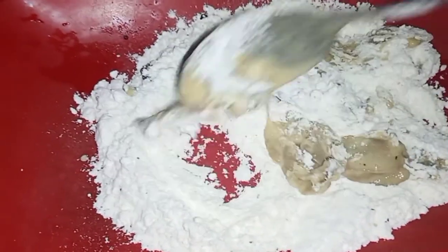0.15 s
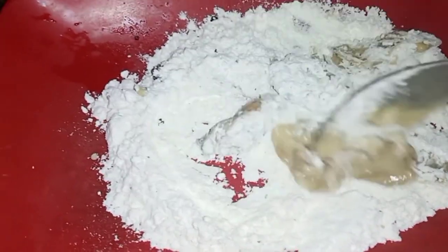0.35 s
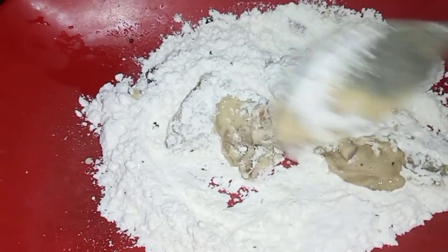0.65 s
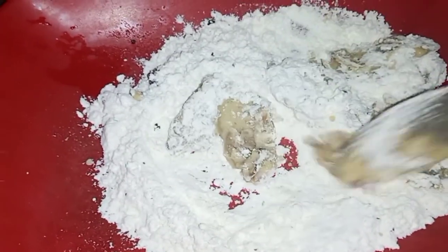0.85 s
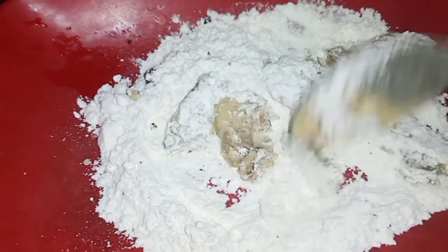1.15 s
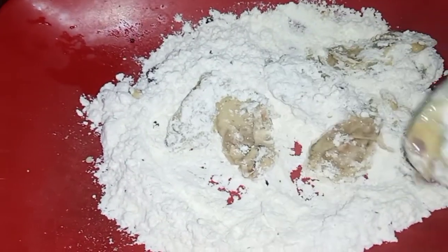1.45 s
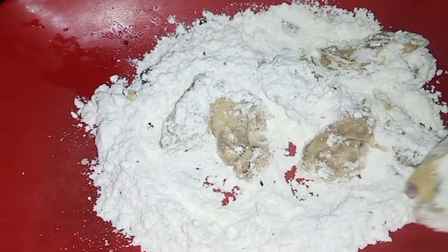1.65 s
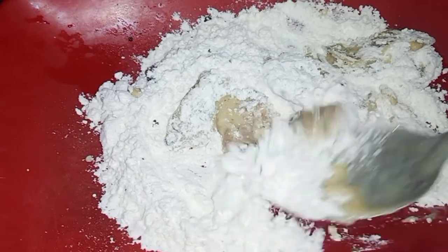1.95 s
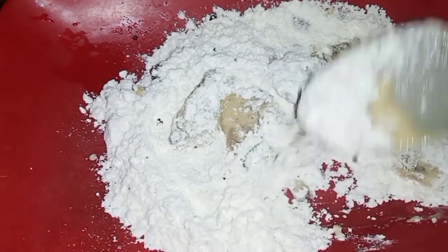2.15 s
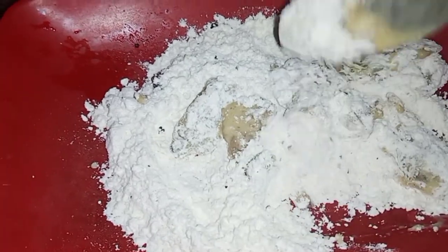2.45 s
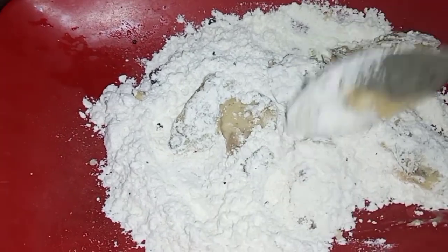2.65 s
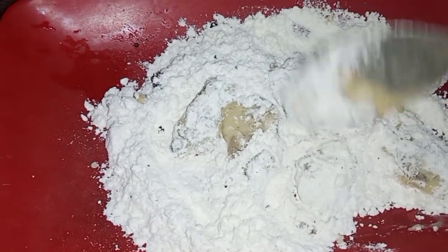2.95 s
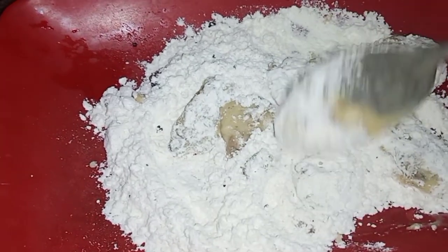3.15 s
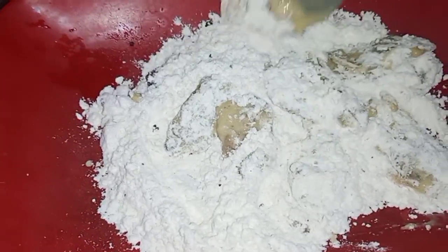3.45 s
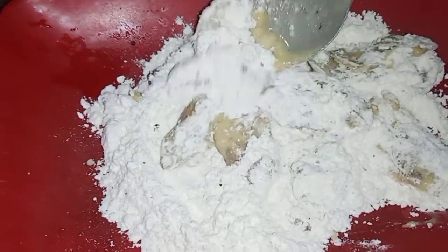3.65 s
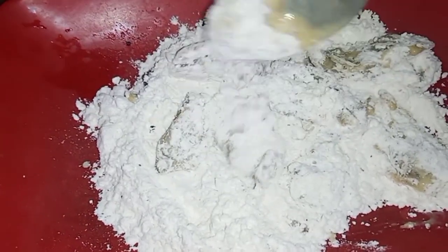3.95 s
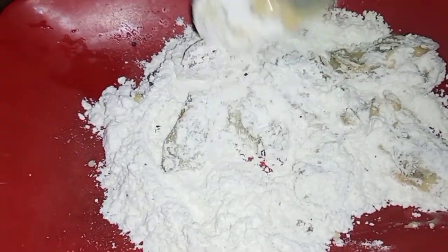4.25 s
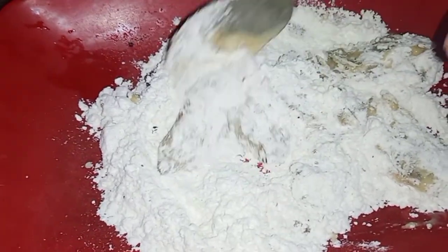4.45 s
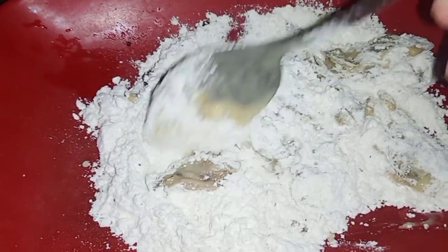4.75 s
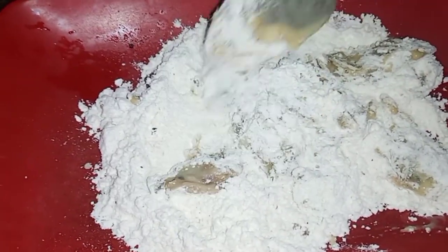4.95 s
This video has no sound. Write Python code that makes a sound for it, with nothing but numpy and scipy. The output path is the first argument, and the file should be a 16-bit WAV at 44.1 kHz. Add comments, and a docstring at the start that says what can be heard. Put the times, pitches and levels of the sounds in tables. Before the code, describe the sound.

Close to a phone microphone in a small, dry kitchen, a metal spoon makes short gritty scrapes on a plastic plate in flour. A clack comes near 0.9 seconds, a cluster of taps and bright scrapes around 1.6 to 1.8, then faint brushing. The loudest sharp clack lands near 3.4, followed by a short rasp, then mostly quiet hiss and low rumble.

```python
"""In a kitchen, close to a phone microphone, a steel spoon scrapes and taps a plastic plate in dry flour.
Noise-like friction and short blows excite damped modes of rim, bowl, grit and plate; walls add a faint tail.
Flour sifts as streaky noise through a cavity resonance; dull bumps in the worktop are swells of low sines.
Behind them, resonant noise makes a lumpy rumble, a rough hum and two thin wavering insect-like whistles,
and shaped noise makes a faint hiss."""
import sys
import numpy as np
from scipy import signal
from scipy.fft import rfft, irfft, next_fast_len
from scipy.io import wavfile
from scipy.ndimage import uniform_filter1d, map_coordinates

SR = 44100
rng = np.random.default_rng(int(sys.argv[2]) if len(sys.argv) > 2 else 0)


def generate_wav(sig):
    """Save sig (samples, or channels by samples) to the path in sys.argv[1] as 16-bit PCM at SR."""
    pcm = np.round(np.clip(np.atleast_2d(sig).T, -1, 1) * 32767).astype(np.int16)
    wavfile.write(sys.argv[1], SR, pcm)


N = 225262

# In every mode table, width is that of a single resonator and level is relative within the table.
# Room and microphone hiss, relative spectral density: f/Hz, level/dB
HISS_SPECTRUM = [(15, -22), (25, -17.5), (80, 2.5), (144, -1.5), (1210, -19), (1350, -17), (2380, -22),
                 (3860, -20), (4930, -25), (6810, -21), (8450, -27), (10500, -28.5), (15700, -27)]
# Rumble strength over time, before flutter: t/s, level/dB
RUMBLE_LEVEL = [(0.0, -79), (0.24, -85), (0.78, -71.5), (0.98, -80), (1.22, -69), (1.35, -62),
                (1.51, -67.5), (1.72, -75), (1.92, -61.5), (2.12, -80.5), (2.53, -77.5), (3.0, -78.5),
                (3.19, -59), (3.34, -68), (3.58, -73.5), (4.18, -75.5), (4.58, -85.5), (5.11, -74)]
# Rumble modes: f/Hz, width/Hz, level/dB
RUMBLE_MODES = [(62.3, 36, -8), (78.2, 19, 1)]
# Appliance hum modes: f/Hz, width/Hz, level/dB
HUM_MODES = [(104, 54, -3), (143.1, 4.7, 4), (177, 3.5, -6), (233.4, 10.4, -2.5), (262.5, 5.8, -3.5),
             (377, 29, -16), (399, 6.2, -7)]
# Lower and upper whistle, one mode each: f/Hz, width/Hz, level/dB
WHISTLE_MODES = [(5745, 110, 0), (10350, 130, 0)]
# Lower whistle strength over time, before flicker: t/s, level/dB
LOW_WHISTLE_LEVEL = [(0.0, -87), (1.19, -74), (1.36, -76), (1.61, -87), (1.73, -56), (2.23, -95.5),
                     (2.72, -76), (3.03, -96), (3.36, -89), (3.54, -85), (3.83, -83), (4.11, -78.5),
                     (4.88, -85), (5.11, -78.5)]
# Dull bumps through the worktop: t/s of the centre, RMS level/dB there, f/Hz
BUMPS = [(.075, -59.5, 68), (.225, -62, 70), (0.472, -56, 68), (0.629, -58.5, 72), (.7, -58.5, 70),
         (.89, -61, 75), (1.0, -62, 78), (1.26, -58.5, 75.35), (1.33, -63, 77), (1.39, -58, 76),
         (1.8, -56, 74), (1.85, -58.5, 76.4), (2.29, -58.5, 71.1), (2.349, -59.5, 70), (2.45, -65.5, 75),
         (2.63, -62.5, 70), (2.935, -65, 68), (3.04, -64, 76), (3.54, -53, 74), (4.2, -64, 72),
         (5.0, -68, 68.8), (5.061, -61, 62), (5.105, -59, 62)]
# Sifting flour strength over time: t/s, level/dB
SIFT_LEVEL = [(0.0, -75.5), (0.5, -76.5), (0.65, -75.5), (1.05, -76), (1.19, -73.5), (1.41, -78.5),
              (1.62, -69.5), (1.76, -61), (2.08, -80.5), (2.84, -79.5), (3.37, -81), (3.54, -63),
              (3.73, -82), (3.88, -81), (4.23, -77.5), (4.61, -75.5), (4.72, -75.5), (5.11, -78)]
# Microphone cavity modes that colour the flour: f/Hz, width/Hz, level/dB
CAVITY_MODES = [(6410, 560, 2.5), (7020, 740, 7), (7940, 67, -6), (7860, 360, -20)]
# Reverberation of the kitchen: f/Hz, t60/s
ROOM_DECAY = [(300, 0.063), (3000, 0.073), (12000, 0.047)]
# Spoon rim modes: f/Hz, width/Hz, level/dB
RIM_MODES = [(4980, 730, -9), (5570, 235, 0.5), (5900, 89, 1), (6464, 780, 0), (6875, 220, 1),
             (7156, 230, -2.5), (7630, 300, -1.5), (8190, 410, -4), (8480, 290, -10.5)]
# Spoon bowl modes: f/Hz, width/Hz, level/dB
BOWL_MODES = [(1180, 500, -7), (1354, 540, -5), (1515, 224, -7.5), (1806, 293, -4.5), (2090, 117, -8.5),
              (2306, 266, -2.5), (2642, 240, -6), (2933, 260, -1), (3316, 236, -3), (3585, 127, 4),
              (3963, 470, -3.5), (4400, 206, -1), (4698, 153, 2)]
# Grit modes: f/Hz, width/Hz, level/dB
GRIT_MODES = [(9010, 440, 0.5), (9860, 630, -9.5), (11400, 2300, -13.5), (12600, 1200, -14.5),
              (14370, 2600, -7)]
# Plate modes: f/Hz, width/Hz, level/dB
PLATE_MODES = [(242, 68, -8), (322.3, 39, 2.5), (393, 110, -7), (472, 63, 0.5), (595.6, 87, 2.5),
               (724, 57, 0), (863, 79, -2), (1068, 79, -7)]
# Contact spots, named for their colour: favoured bowl f/Hz, favoured plate f/Hz, fall/(dB per octave) away,
# valley f/Hz where the contact sits on a node, valley depth/dB
SPOTS = {"light": ([3200, 4800], [240], 7.4, [1300, 1870, 5170, 8400], 9.6), "woody": ([1800, 5500],
         [690, 340], 9.1, [1070, 2450, 4700], 7.8), "squeaky": ([3400, 3500], [420],
         12, [1880, 2680, 4740, 8360], 15), "hollow": ([1780, 3640], [321, 873], 26, [1250, 2700, 4700],
         18), "nasal": ([2150, 3700], [718], 24, [1250, 2800, 5150, 7750], 24), "bright": ([2290, 3340],
         [718], 24, [1150, 2850, 4150, 7550], 11), "dull": ([1250, 1600], [560, 873],
         12, [330, 3200, 4800, 8500], 14), "ringing": ([1564, 3640], [602, 873], 40, [740, 1050], 12),
         "thin": ([1380, 3342], [300], 30, [1900, 2600, 4560], 15), "sharp": ([2020, 4800], [602, 520],
         24, [300, 1200, 3000, 5600], 8.1), "full": ([2270, 2600], [440, 710], 14, [300, 1150, 1500, 4600],
         2.6), "mid": ([1950, 2150], [650], 38, [320, 3300, 5300, 8400], 11), "low": ([1500], [240],
         45, [485, 3300, 5300], 9)}
# Scraping strokes: t/s of full pressure, hold/s, rise/(dB/s), fall/(dB/s), rim level/dB,
# bowl, grit and plate level/dB over the rim, spot
STROKES = [(0.0, 0.019, 900, 627, -53, -10.5, -1, -40, "light"),
           (0.398, 0.0088, 245, 330, -57, -13.5, -10.5, -32, "light"),
           (0.86, 0.021, 1770, 700, -47.5, -11, -6.5, -13, "woody"),
           (0.904, .004, 900, 202, -66, -13, -11, -8.5, "woody"),
           (0.93, 0.023, 900, 300, -89, -2, -20, 13.5, "ringing"),
           (1.058, 0.01, 305, 152, -69, -1, -16, -38, "squeaky"),
           (1.08, 0.015, 400, 300, -81, 11, -23, -18, "squeaky"),
           (1.115, 0.017, 300, 303, -84, 4.5, -22, -15, "thin"),
           (1.593, 0.0033, 1900, 305, -67, 6, -35, 10, "hollow"),
           (1.623, 0.016, 900, 100, -66.5, 2, -2, -24, "nasal"),
           (1.666, .004, 400, 115, -48.5, 2.5, -5, -26.5, "nasal"),
           (1.732, .008, 600, 215, -46, -8, -9.5, -58, "bright"),
           (1.755, 0.0043, 400, 326, -31.5, -7, -14.5, -39, "bright"),
           (1.818, 0.004, 300, 400, -60, -3, -7, -9, "bright"),
           (1.875, 0.0016, 297, 260, -70, -15, -23, -23, "sharp"),
           (2.094, .004, 550, 149, -66.5, -16, -34, -25, "light"),
           (2.277, 0.052, 298, 210, -72.5, -11, -6.5, -24, "light"),
           (2.385, .004, 405, 260, -77, -7, -17, -28.5, "mid"),
           (2.542, 0.0032, 644, 214, -64, -19.5, -13, -24, "light"),
           (3.05, 0.022, 800, 200, -65, 0, -18, 2.5, "dull"),
           (3.098, 0.014, 400, 500, -78, 4.5, -30, 5.5, "dull"),
           (3.386, 0.0018, 1920, 656, -41, -1.5, -6, -7.5, "full"),
           (3.442, 0.0067, 320, 227, -46.5, -1, -6, -14, "full"),
           (3.469, 0.057, 300, 1500, -46, -6.5, -10.5, -19.5, "full"),
           (3.54, 0.0031, 890, 174, -75, -26, -22.5, -40, "full"),
           (4.097, .004, 218, 153, -68, -19, -12, -17, "light"),
           (4.155, 0.031, 900, 300, -91, 1, -26, 18.5, "mid"),
           (4.215, 0.019, 400, 700, -85.5, -23, -11, 19, "low")]
# Taps: t/s, rim level/dB, bowl, grit and plate level/dB over the rim, spot
TAPS = [(0.3184, -67, -15, 11, -14, "light"), (0.8525, -26.5, -11.5, -12, -24, "woody"),
        (0.8764, -57, -5, -16, -8, "woody"), (1.4205, -67.5, 0, 4.5, -9, "light"),
        (1.5845, -43, 9.5, -19, 11, "hollow"), (1.621, -40.5, 4.5, -8, -24, "nasal"),
        (2.3575, -59.5, -1.5, -17, -14, "mid"), (3.3739, -14.5, -5.5, -10.5, -15.5, "sharp"),
        (3.3824, -30, 4.5, 0, -17, "sharp")]

TOP_HZ = 15550  # band limit of the phone
BUMP_SIGMA_S = 0.013  # standard deviation of a bump's Gaussian swell
RIM_HZ, GRIT_HZ = 7180, 10960  # region where rim and grit are driven best
LANDING_DB_PER_S2 = 2508  # extra steepness of a stroke's start, so that it grows from nothing
BLOW_RISE_S, BLOW_T60_S = 0.0039, 0.016  # rise time constant and decay time of a tap's force
CLICK_S, CLICK_DB = 0.001215, 6  # delay of the click inside a tap, its level over the blow's scale
ROOM_DB, ROOM_DELAY = -21, 300  # level of the wall tail, its delay in samples


def amp(db):
    """Level definition: decibels to an amplitude ratio."""
    return 10 ** (np.asarray(db) / 20)


def unit(x):
    """Normalization: a signal scaled to unit RMS."""
    return x / np.sqrt(np.mean(x ** 2) + 1e-20)


def along(points, hz):
    """Logarithmic frequency scale: linear interpolation of (f, value) points along log f."""
    f, value = np.transpose(points)
    return np.interp(np.log(hz + 1), np.log(f + 1), value)


def level_curve(rows):
    """Linear interpolation: one level per sample from (t, level) rows."""
    t, level = np.transpose(rows)
    return np.interp(np.arange(N) / SR, t, level)


def wobble(rate):
    """Band-limited fluctuation: a smooth curve through random knots, rate of them a second."""
    knots = rng.standard_normal(int(N * rate / SR) + 4)
    return map_coordinates(knots, [np.arange(N) * rate / SR])


def filtered(x, response):
    """Linear filtering: the spectrum of x times a complex response of frequency."""
    n = x.shape[-1]
    padded = next_fast_len(n + SR // 4)
    spectrum = rfft(x, padded) * response(np.fft.rfftfreq(padded, 1 / SR))
    return irfft(spectrum, padded)[..., :n]


def power_kept(h):
    """Power conservation: a response scaled to keep the power of white noise."""
    return h / np.sqrt(np.mean(abs(h) ** 2))


def modes(table, order=1):
    """Modal superposition: causal damped resonators summed with alternating sign."""
    def response(f):
        h = 0
        for k, (centre, width, db) in enumerate(table):
            resonator = 1j * f * width / (centre * centre - f * f + 1j * f * width)
            h = h + (-1) ** k * amp(db) * resonator ** order
        return power_kept(h)
    return response


def resonant_noise(noise, table):
    """Noise excitation of resonators: random force heard through double modes, at unit RMS."""
    return unit(filtered(noise, modes(table, order=2)))


def patchy(patchy_db, bins, frames):
    """Nonstationary noise: white noise whose gain drifts in small patches of time and frequency."""
    z = signal.stft(rng.standard_normal(N + 1024), nperseg=512)[2]
    field = uniform_filter1d(rng.standard_normal(z.shape), bins, 0)
    field = uniform_filter1d(field, frames, 1)
    return unit(signal.istft(z * amp(patchy_db * unit(field)), nperseg=512)[1][:N])


def hiss():
    """Broadband noise: slightly patchy noise given the spectrum of room and microphone."""
    noise = patchy(2.66, bins=2, frames=8)
    return amp(-73) * unit(filtered(noise, lambda hz: amp(along(HISS_SPECTRUM, hz))))


def drone():
    """Narrow-band noise: low resonances give a rumble in lumps and a rough appliance hum."""
    rumble = resonant_noise(rng.standard_normal(N), RUMBLE_MODES)
    hum = resonant_noise(rng.standard_normal(N), HUM_MODES)
    rumble_db = level_curve(RUMBLE_LEVEL) + 2.0 * wobble(22)
    hum_db = -75.0 + 0.87 * wobble(5.65)
    return amp(rumble_db) * rumble + amp(hum_db) * hum


def whistles():
    """Narrow-band noise: two sharp resonances share one noise and flicker separately in level."""
    noise = rng.standard_normal(N)
    low, high = (resonant_noise(noise, [mode]) for mode in WHISTLE_MODES)
    low_db = level_curve(LOW_WHISTLE_LEVEL) + 3 * wobble(12)
    high_db = -97.0 + 4 * wobble(9)
    return amp(low_db) * low + amp(high_db) * high


def bumps():
    """Gaussian wave packet: each bump is a soft swell of a few low cycles."""
    t = np.arange(N) / SR
    out = np.zeros(N)
    for at, db, hz in BUMPS:
        swell = np.exp(-((t - at) / BUMP_SIGMA_S) ** 2 / 2)
        phase = rng.uniform(0, 2 * np.pi)
        out += np.sqrt(2) * amp(db) * swell * np.sin(2 * np.pi * hz * t + phase)
    return out


def flour():
    """Cavity resonance: sliding powder is a soft streaky hiss coloured by the microphone's cavity."""
    streaks = patchy(5.5, bins=2, frames=13)
    return amp(level_curve(SIFT_LEVEL)) * resonant_noise(streaks, CAVITY_MODES)


def walls(x):
    """Reverberation: convolution with a noise tail in which each frequency has its own decay time."""
    hz, t, z = signal.stft(rng.standard_normal(SR // 2), SR, nperseg=256)
    decay = amp(-60 * t / along(ROOM_DECAY, hz)[:, None])
    tail = signal.istft(z * decay, SR, nperseg=256)[1]
    delayed = np.pad(x, (ROOM_DELAY, 0))
    return signal.fftconvolve(delayed, tail / np.linalg.norm(tail))[:N]


def touched(table, near_hz, fall_db, depth_db, nodes_hz):
    """Mode participation: modes close to near_hz are driven best, and each node cuts a valley."""
    driven = []
    for centre, width, db in table:
        octaves_away = abs(np.log2(centre / np.array(near_hz))).min()
        driven.append((centre, width, db - fall_db * octaves_away))
    ringing = modes(driven, order=2)

    def response(f):
        h = ringing(f)
        broad = .32j * f  # valley width is 0.32 of its frequency
        for node in nodes_hz:
            detuning = node * node - f * f
            h = h * (detuning + amp(-depth_db) * broad * node) / (detuning + broad * node)
        return power_kept(h)
    return response


def rung(force, at, spot):
    """Forced vibration: four forces starting at one time ring rim, bowl, grit and plate."""
    bowl_hz, plate_hz, fall_db, nodes_hz, depth_db = SPOTS[spot]
    tables = RIM_MODES, BOWL_MODES, GRIT_MODES, PLATE_MODES
    favoured = [RIM_HZ], bowl_hz, [GRIT_HZ], plate_hz
    ring = 0
    for part_force, table, near_hz in zip(force, tables, favoured):
        ring = ring + filtered(part_force, touched(table, near_hz, fall_db, depth_db, nodes_hz))
    start = round(at * SR) + SR  # a second of margin allows a start before zero
    return np.pad(ring, (start, N + SR))[SR:SR + N]


def strokes():
    """Friction excitation: the edge chatters over flour grains, stronger as pressure grows."""
    chatter = amp(0.45 * wobble(230) + 2.36 * wobble(40))  # slips a few ms apart
    grains = [unit(chatter * patchy(2.04, bins=3, frames=5)) for part in range(4)]
    grains = np.pad(grains, ((0, 0), (SR, SR)))
    t = np.arange(-SR // 4, SR // 2) / SR  # zero is the start of full pressure
    fade = signal.windows.tukey(len(t), 1 / 4)
    out = np.zeros(N)
    for at, hold, rise, fall, rim_db, *over_db, spot in STROKES:
        before, after = np.maximum(-t, 0), np.maximum(t - hold, 0)
        pressure_db = -rise * before - LANDING_DB_PER_S2 * before ** 2 - fall * after
        start = round((at + t[0]) * SR) + SR
        slips = grains[:, start:start + len(t)] * fade
        part_db = rim_db + np.array([0, *over_db])[:, None]
        out += rung(slips * amp(part_db + pressure_db), at + t[0], spot)
    return out


def taps():
    """Impact excitation: a short burst of noise force with one sharp click inside it."""
    t = np.arange(SR // 5) / SR
    envelope = (1 - np.exp(-t / BLOW_RISE_S)) * amp(-60 * t / BLOW_T60_S)
    out = np.zeros(N)
    for at, rim_db, *over_db, spot in TAPS:
        blow = envelope * rng.standard_normal((4, len(t)))
        blow[:, round(CLICK_S * SR)] += amp(CLICK_DB)  # the hard edge meets the plate
        part_db = rim_db + np.array([0, *over_db])[:, None]
        out += rung(blow * amp(part_db), at, spot)
    return out


def spoon():
    """Superposition: scrapes and taps both ring spoon and plate."""
    return strokes() + taps()


def scene():
    """Superposition at one microphone, which feeds both channels."""
    background = hiss() + drone() + whistles() + bumps() + flour()
    near = spoon()
    return np.tile(background + amp(ROOM_DB) * walls(near) + near, (2, 1))


def record(dry):
    """Band limitation: a very steep low-pass, as the phone keeps almost nothing above its limit."""
    return filtered(dry, lambda hz: 1 / (1 + (hz / TOP_HZ) ** 160))


dry = scene()
out = record(dry)
generate_wav(out)
```